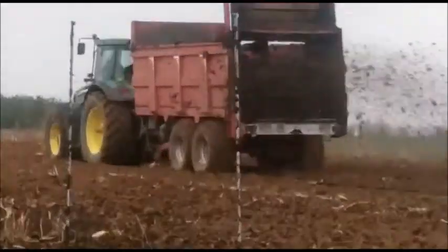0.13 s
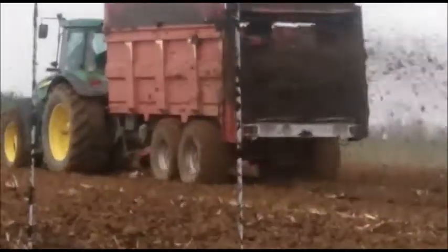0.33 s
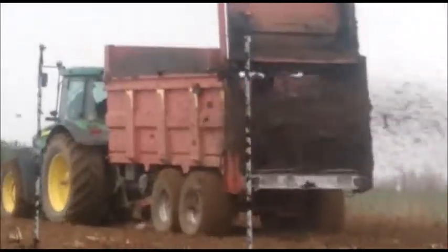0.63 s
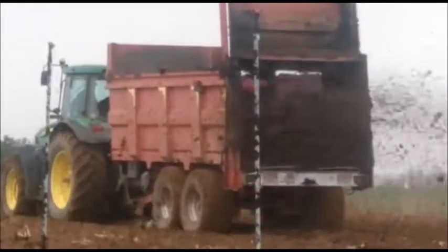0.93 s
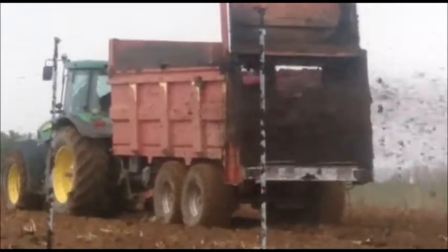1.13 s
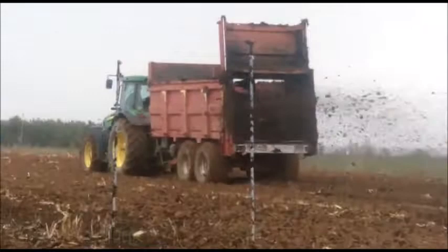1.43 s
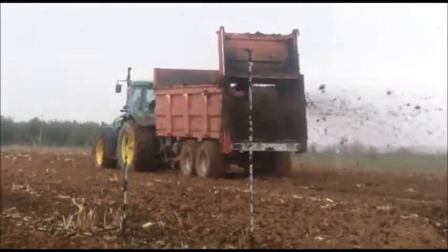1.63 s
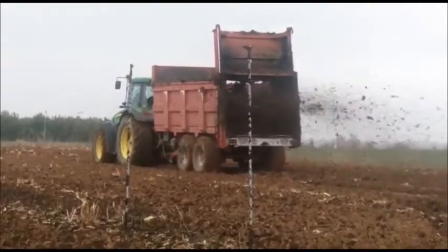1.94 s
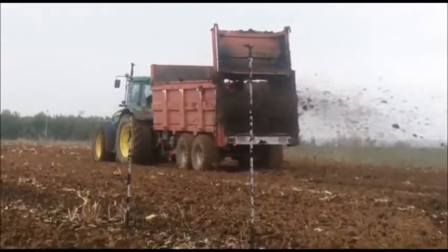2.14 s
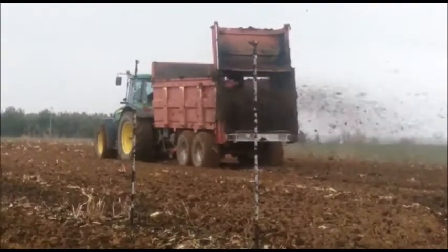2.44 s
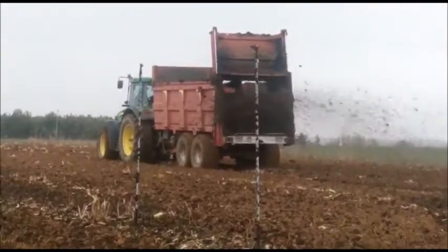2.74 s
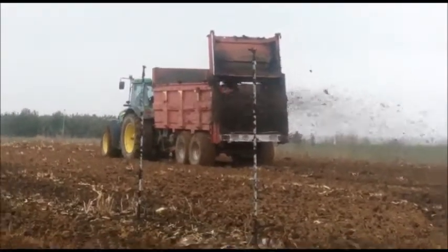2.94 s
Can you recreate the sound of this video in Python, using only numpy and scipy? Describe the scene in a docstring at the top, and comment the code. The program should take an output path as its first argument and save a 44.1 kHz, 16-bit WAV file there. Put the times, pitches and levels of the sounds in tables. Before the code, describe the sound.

A manure spreader clatters for the whole three seconds, its steel parts rattling about five times a second with sharp irregular knocks and short pings. The knocks are densest and loudest from about 0.5 to 1.2 seconds, then thin slightly. Flung clods patter over a steady hiss. Underneath, wheels rumble and a faint tractor engine throbs and fades. Light wind touches the microphone, most around 1.6 seconds.

```python
"""In an open field, a tractor draws a manure spreader slowly away from a two-port microphone.
Loose steel in the spreading gear knocks, pings and rattles once per turn of its shaft; each impact
excites the damped modes of the struck part and of the trailer box. Flung clods patter over a hiss.
Beneath them the diesel exhaust throbs and fades, the wheels rumble, and light gusts touch the ports."""
import sys
import numpy as np
from scipy import signal
from scipy.fft import rfft, irfft, next_fast_len
from scipy.io import wavfile
from scipy.ndimage import uniform_filter1d

SR = 44100
rng = np.random.default_rng(int(sys.argv[2]) if len(sys.argv) > 2 else 0)


def persist_wave(psi):
    """Save psi, clipped to +-1, as 16-bit WAV."""
    counts = np.round(np.clip(psi, -1, 1) * 32767).astype(np.int16)
    wavfile.write(sys.argv[1], SR, np.atleast_2d(counts).T)


N = 135828
TURN_S = .186  # one turn of the spreader shaft

# Spectral envelope of the steel clatter. Each row: frequency in Hz, relative level in dB.
STEEL_SPECTRUM = [(100, -26.5), (440, -23), (560, -11.5), (1120, -12.5), (1350, 3.5), (1750, -2.5),
                  (2100, -2.5), (2650, -2.5), (3400, 1.5), (4000, -3), (4400, -0.5), (7000, -4),
                  (8100, -11.5), (8800, -7.5), (10500, -14.5), (12000, -26), (13000, -21.5), (16000, -29)]


def steel_impact(db, bright_db, part_hz):
    """Impact excitation: a broadband crack sets the part and the box ringing in their damped modes."""
    # Modes of the steel box. Each row: frequency in Hz, relative level in dB, T60 in seconds.
    box_modes = [(655.5, -13, 0.22), (847, -16, 0.094), (972, -13.5, 0.21), (1590, -15, 0.13),
                 (3610, -9.5, 0.038)]
    t = np.arange(SR // 5) / SR
    # Every contact has its own random spectral peaks and dips, on a 300 Hz grid.
    grid_hz = np.arange(0, SR / 2, 300)
    ripple_db = 3 * np.clip(rng.standard_normal(len(grid_hz)), -2, 1.5)
    ripple = undb(np.interp(np.fft.rfftfreq(len(t), 1 / SR), grid_hz, ripple_db))
    crack, tail = unit(irfft(rfft(rng.standard_normal((2, 2, len(t)))) * ripple))
    low, below_treble = lowpass(crack, hz=2100), lowpass(crack, hz=3600)
    age = t * np.exp(-.035 * (db + 25))  # heavier blows decay more slowly
    body = low * decay(age, t60=.052) + (below_treble - low) * decay(age, t60=.029)
    snap = undb(-1.5) * decay(t, t60=.0014)
    treble = (crack - below_treble) * (decay(age, t60=.02) + snap)
    tilt = undb(bright_db / 2)
    part = undb(-9.5) * damped_mode(t, part_hz, t60=.041)
    box = undb(-17.5) * tail * decay(t, t60=.21)  # diffuse ring beneath the distinct modes
    for hz, mode_db, t60 in box_modes:
        gain = undb(mode_db - 11.5 + 3 * rng.standard_normal())
        detuned_hz = hz * (1 + .018 * rng.standard_normal())
        box += gain * damped_mode(t, detuned_hz, t60)
    attack = 1 - np.exp(-t / .00031)
    return undb(db) * attack * (body / tilt + treble * tilt + part + box)


def gear_knocks():
    """Double contact: a loose part grazes lightly a few milliseconds before it strikes hard."""
    # Hard knocks of the gear. Each row: start in seconds, level in dB, treble tilt in dB,
    # ring frequency of the struck part in Hz.
    knocks = [(0.0068, -24, 1, 2980), (0.0428, -28, -3, 2790), (0.0983, -25.5, 5.5, 5850),
              (0.1747, -26, -1, 3710), (0.1916, -24.5, -6, 2780), (0.2045, -25.5, 2, 6920),
              (0.3457, -21.5, 1.5, 1790), (0.3665, -31.5, 3, 3210), (0.3789, -30, 2, 1810),
              (0.4129, -27.5, -8, 2930), (0.4835, -33.5, 14, 3280), (0.546, -28.5, 4, 1280),
              (0.5602, -28, -4, 3280), (0.5647, -22, 2.5, 1414), (0.653, -19.5, 14, 6680),
              (0.6726, -27, -9, 4080), (0.7334, -27, 7, 5220), (0.74, -29, 6, 905), (0.7476, -23, -1, 2350),
              (0.7596, -21, 0.5, 1504), (0.7645, -30.5, 1, 900), (0.8284, -19, 4, 5980),
              (0.8349, -22, -1, 850), (0.9118, -24.5, 6, 5700), (0.9171, -28.5, -1, 940),
              (0.9243, -28.5, -10, 1350), (0.9363, -22, -2.5, 1250), (0.9511, -28, 6, 1500),
              (0.9707, -25, -4, 3340), (1.0444, -38.5, 19, 3640), (1.1039, -24, -1, 3670),
              (1.1188, -21, -6, 684), (1.1231, -25.5, 7, 935), (1.1566, -26.5, -6.5, 2480),
              (1.2895, -32, 7, 3300), (1.2949, -30, -11, 626), (1.3091, -25.5, -3, 1100),
              (1.4771, -29.5, -8, 1460), (1.4942, -24, -5, 3810), (1.6612, -31, 0, 1680),
              (1.668, -26.5, -5, 640), (1.6805, -23.5, 4, 1080), (1.8503, -32, -1, 1420),
              (1.868, -29.5, -13, 1660), (1.876, -35, 25, 1740), (1.9213, -39.5, -16, 1490),
              (2.033, -29.5, -1, 4360), (2.0537, -22.5, 1, 1070), (2.064, -48, 0, 650),
              (2.1673, -32.5, 3, 1525), (2.2477, -33.5, 4, 1550), (2.4211, -27.5, -13, 850),
              (2.4344, -27.5, -3, 2150), (2.5931, -28.5, 4, 1528), (2.6109, -26, 0, 3900),
              (2.623, -32, 12, 3200), (2.7968, -21, -4, 6040), (2.977, -29.5, -6, 1450),
              (2.984, -25.5, -3.5, 1656), (2.9998, -29, 6, 3480)]
    out = np.zeros((2, N))
    for start, db, bright_db, part_hz in knocks:
        graze_lead_s = .004 * (.5 + rng.random())
        add(out, start - graze_lead_s, steel_impact(db - 13, bright_db, part_hz))
        add(out, start, steel_impact(db, bright_db, part_hz))
    return colour(out, STEEL_SPECTRUM)


def steel_pings():
    """Free vibration: a small hard part clicks, rings at one frequency and passes a knock to the gear."""
    # Sharp strikes. Each row: start in seconds, level in dB, ring frequency in Hz, T60 in seconds.
    strikes = [(0.5881, -32.5, 4530, 0.013), (0.598, -32, 3110, 0.018), (0.6621, -29.5, 3320, 0.039),
               (1.3414, -31, 4540, 0.0084), (2.0793, -34.5, 3590, .028), (2.0994, -34.5, 4560, 0.026),
               (2.1225, -40, 3550, 0.018), (2.4522, -40, 3640, 0.035), (2.6373, -38.5, 3530, 0.038),
               (2.7774, -30, 3500, 0.011), (2.824, -33, 3550, 0.023)]
    out = np.zeros((2, N))
    t = np.arange(SR // 10) / SR
    for start, db, hz, t60 in strikes:
        click = undb(5) * decay(t, t60=.013) * rng.standard_normal((2, len(t)))
        ring = decay(t, t60) * np.sin(2 * np.pi * hz * t)
        add(out, start, undb(db) * (click + ring))
        add(out, start, steel_impact(db + 1.5, bright_db=0, part_hz=hz))
    return colour(out, STEEL_SPECTRUM)


def shaft_rattle():
    """Periodic forcing: five light impacts of loose parts cluster at one point of every shaft turn."""
    first_turn_s, spread_s = .008, .013
    out = np.zeros((2, N))
    for turn in np.arange(first_turn_s, N / SR, TURN_S):
        for timing, softness, pitch in rng.standard_normal((5, 3)):
            hit = steel_impact(db=-34 - 2 * softness, bright_db=0, part_hz=2536 * 2 ** (pitch / 2))
            add(out, turn + spread_s * timing, hit)
    return colour(out, STEEL_SPECTRUM)


def clod_spray():
    """Shot noise: shredded clods land at random and their powers add, over a slightly flickering hiss."""
    # Spectral envelope of the spray. Each row: frequency in Hz, relative level in dB.
    spray_spectrum = [(100, -15), (450, -8), (620, -0.5), (1120, -4.5), (1350, 7.5), (1750, -1), (1950, 1),
                      (2480, -7.5), (2700, 0), (3500, 3), (4100, -1.5), (6500, -3.5), (7400, -6.5),
                      (8050, -11.5), (8800, -5.5), (10500, -14), (12000, -25), (13000, -19.5),
                      (16000, -24.5)]
    clods_per_s, scatter_db = 140, 3.5
    hiss = undb(-45.5 - 1.37 * drift(rate_hz=22.35)) * rng.standard_normal((2, N))
    landings = rng.random(N) < clods_per_s / SR
    hits = landings * undb(scatter_db * np.clip(rng.standard_normal(N), -2, 2))
    power_kept = decay(1 / SR, t60=.013) ** 2  # from one sample to the next
    power = signal.lfilter([1], [1, -power_kept], hits ** 2)
    patter = unit(np.sqrt(power) * rng.standard_normal((2, N)))
    return colour(hiss + undb(-48.5) * patter, spray_spectrum)


def diesel_exhaust(t):
    """Modulated line spectrum: low exhaust tones waver under load and throb twice per shaft turn."""
    # Exhaust tones. Each row: frequency as a multiple of the firing rate, level in dB.
    exhaust_lines = [(2 / 3, -65), (0.98, -55.5), (3.09, -68.5)]
    firing_hz, throb_peak_s = 90.2, .65
    wavering_hz = firing_hz * (1 + .02106 * drift(rate_hz=8))
    phase = 2 * np.pi * np.cumsum(wavering_hz) / SR
    throb_db = 7 * np.cos(2 * np.pi * (t - throb_peak_s) / (TURN_S / 2))
    out = np.zeros(N)
    for multiple, db in exhaust_lines:
        flutter_db = 1.5 * drift(rate_hz=24.3)
        out += undb(db) * unit(np.sin(multiple * phase) * undb(throb_db + flutter_db))
    return out


def trailer_rumble():
    """Rolling noise: wheels on soft soil shake the trailer into a low, gently swelling rumble."""
    # Spectral envelope of the rumble. Each row: frequency in Hz, relative level in dB.
    rumble_spectrum = [(20, -41), (35, -16), (48, 1.5), (65, 6), (95, 4), (125, -3.5), (200, -19),
                       (400, -26), (700, -23), (2000, -50.5)]
    level_db = -54.5 + 1.5 * drift(rate_hz=6.13)
    return undb(level_db) * colour(rng.standard_normal((2, N)), rumble_spectrum)


def wind_gusts(t):
    """Turbulent pressure: short gusts make low noise at the ports, more strongly at the left one."""
    # Gaussian gusts. Each row: peak time in seconds, standard deviation in seconds, level in dB.
    gusts = [(0.08, 0.031, -56), (0.523, 0.02, -51), (0.948, 0.27, -55), (1.588, 0.031, -45.5),
             (1.872, 0.022, -52), (2.096, 0.014, -48.5), (2.75, 0.029, -55)]
    # Spectral envelope of the wind. Each row: frequency in Hz, relative level in dB.
    wind_spectrum = [(35, -11.5), (52, 9.5), (85, 8.5), (130, 1), (250, -10.5), (500, -12), (1500, -50)]
    envelope = sum(undb(db) * np.exp(-.5 * ((t - peak) / width) ** 2) for peak, width, db in gusts)
    port_gains = undb([[5.5], [0]])
    return envelope * colour(rng.standard_normal((2, N)), wind_spectrum) * port_gains


def microphone_ports(pair):
    """Acoustic shadowing: the left port faces away, so its treble is shaded, late and partly scattered."""
    # Left port against the right. Each row: frequency in Hz, gain in dB.
    shadow = [(70, -2), (160, 6), (380, 4.5), (650, 0.5), (1120, 6.5), (1350, -3), (1750, 1.5), (2000, 0.5),
              (2230, -24.5), (2430, -8.5), (2620, 7), (3000, -32), (3400, -15.5), (3750, -32),
              (4100, -16.5), (5600, -15), (6150, -29), (7200, -6.5), (8200, -41), (8900, -11), (10300, -32),
              (13500, -11.5)]
    # Delay of the left port. Each row: frequency in Hz, phase lag in radians.
    phase_lag = [(100, -0.1), (430, 1.2), (560, 0.32), (950, 1.14), (1300, 2.5), (1750, 1.5), (1960, 3.5),
                 (3000, 3.5), (4400, 5.5), (5000, 4.5), (7000, 8.5)]
    # Coherence of the two ports. Each row: frequency in Hz, correlation from 0 to 1.
    coherence = [(150, 0.89), (500, 0.92), (2480, 1), (3000, 0.98), (11000, 0.43)]
    size = 2 * next_fast_len(N // 2 + SR // 10)
    direct, scattered = rfft(pair, size)
    alike = on_bins(coherence, size)
    left = alike * direct + np.sqrt(1 - alike ** 2) * scattered
    left *= undb(on_bins(shadow, size)) * np.exp(-1j * on_bins(phase_lag, size))
    return irfft(np.array([left, direct]), size)[:, :N]


def damped_mode(t, hz, t60):
    """Damped oscillator: a decaying sine with a random phase in each channel."""
    return decay(t, t60) * np.sin(2 * np.pi * (hz * t + rng.random((2, 1))))


def decay(t, t60):
    """Exponential damping: the amplitude falls by 60 dB in t60 seconds."""
    return np.exp(-np.log(1000) * t / t60)


def drift(rate_hz):
    """Slow random modulation: values drawn at rate_hz, smoothed twice and scaled to unit RMS."""
    hold = int(SR / rate_hz)
    steps = np.repeat(rng.standard_normal(N // hold + 1), hold)
    return unit(uniform_filter1d(uniform_filter1d(steps, hold), hold)[:N])


def colour(x, spectrum):
    """Minimum-phase filtering: impose a spectral envelope at unit power gain for white noise."""
    size = 4096
    cepstrum = irfft(np.log(undb(on_bins(spectrum, size))))
    cepstrum[1:size // 2] *= 2  # folding the cepstrum makes the response causal
    cepstrum[size // 2 + 1:] = 0
    response = irfft(np.exp(rfft(cepstrum)))
    return signal.fftconvolve(x, response[None] / np.linalg.norm(response), axes=1)[:, :N]


def on_bins(points, size):
    """Interpolation in log frequency: read rows of frequency and value at every transform bin."""
    hz, value = np.array(points, float).T
    bin_hz = np.arange(size // 2 + 1) * SR / size
    return np.interp(np.log(bin_hz + 1), np.log(hz), value)


def lowpass(x, hz):
    """Zero-phase filtering: remove the treble without delay."""
    return signal.sosfiltfilt(signal.butter(3, hz, fs=SR, output="sos"), x)


def add(out, start_s, sound):
    """Superposition: mix a sound in at its start time."""
    i = max(int(start_s * SR), 0)
    out[:, i:i + sound.shape[1]] += sound[:, :max(N - i, 0)]


def undb(db):
    """Amplitude ratio of a level in decibels."""
    return 10 ** (np.asarray(db) / 20)


def unit(x):
    """Normalisation to unit RMS."""
    return x / np.sqrt(np.mean(x ** 2))


def scene():
    """Superposition of spreader, engine and wind; the engine fades as the tractor draws away."""
    t = np.arange(N) / SR
    engine_fade_db_per_s = 2
    clatter = gear_knocks() + steel_pings() + shaft_rattle()
    spreader = microphone_ports(clatter + clod_spray() + trailer_rumble())
    engine = undb(-engine_fade_db_per_s * t) * diesel_exhaust(t)
    return spreader + engine + wind_gusts(t)


def record(dry):
    """Soft saturation rounds the hardest peaks, and a steep low-pass limits the bandwidth."""
    ceiling, top_hz = .24, 16100
    rounded = ceiling * np.tanh(dry / ceiling)
    return signal.sosfilt(signal.ellip(10, .2, 70, top_hz, fs=SR, output="sos"), rounded)


dry = scene()
out = record(dry)
persist_wave(out)
```